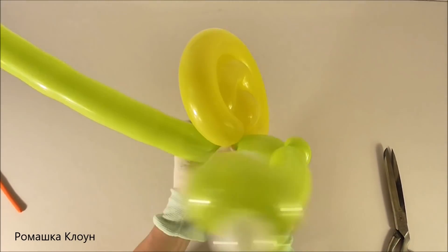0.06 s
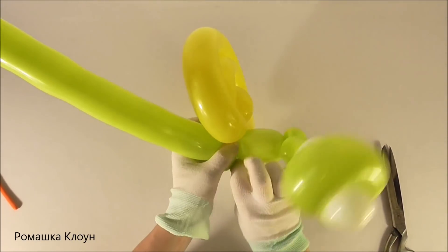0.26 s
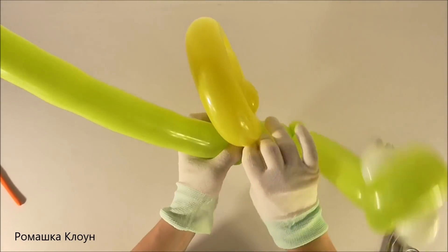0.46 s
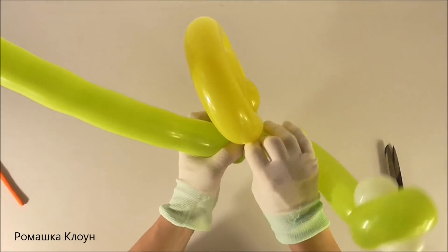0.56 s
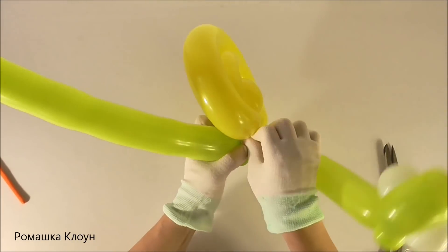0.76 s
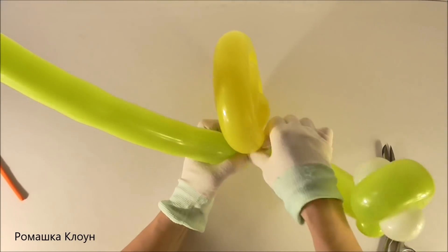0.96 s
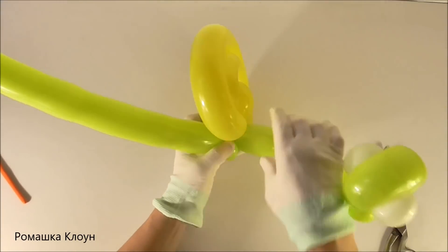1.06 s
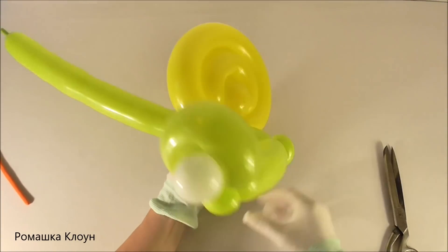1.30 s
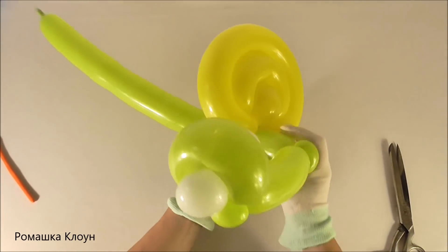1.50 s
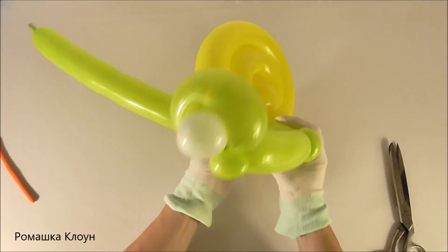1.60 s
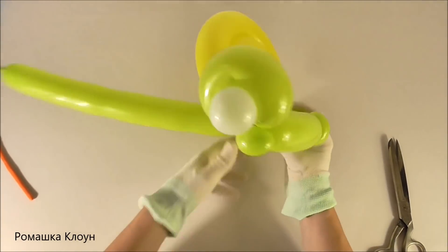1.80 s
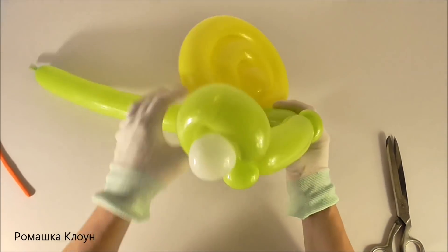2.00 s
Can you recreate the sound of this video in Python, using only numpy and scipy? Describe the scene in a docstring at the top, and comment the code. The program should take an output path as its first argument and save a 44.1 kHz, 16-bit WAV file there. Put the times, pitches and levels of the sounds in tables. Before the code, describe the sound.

Inflated balloons rub together with sharp snaps, brief squeaks and a soft glove hiss.

```python
"""Long latex balloons snap and squeak as gloved hands twist and press them together, close by.
The skins stick and let go: each slip is a sharp snap and a few falling cycles of squeak, and it
rings the air inside. Fast runs of tiny catches make creaks. Between slips the gloves tick and slide
with a grainy hiss, and the balloons bump softly. A table and the walls of a small room add short echoes."""
import sys
import numpy as np
from scipy import signal
from scipy.fft import rfft, irfft, next_fast_len
from scipy.io import wavfile
from scipy.ndimage import uniform_filter1d

SR = 44100
rng = np.random.default_rng(int(sys.argv[2]) if len(sys.argv) > 2 else 0)


def digitize_waveform(pressure):
    """Quantize a signal to 16-bit integers and store it at the path in sys.argv[1].

    Rows of a 2-D input are taken as channels; values are limited to [-1, 1].
    """
    field = np.atleast_2d(pressure).T
    bounded = np.clip(field, -1, 1)
    quanta = np.round(bounded * 32767).astype(np.int16)
    wavfile.write(sys.argv[1], SR, quanta)


N = 90404
SNAP_RISE_S = 0.00029


def undb(db):
    """Turn decibels (dB) into a number to multiply by."""
    return 10 ** (np.asarray(db) / 20)


def unit(x):
    """Scale a sound to an average power of 1."""
    return x / np.sqrt(np.mean(x ** 2))


def over_hz(points, hz):
    """Read between (Hz, value) points, giving each octave equal room."""
    p = np.array(points, float)
    return np.interp(np.log(np.maximum(hz, 1)), np.log(p[:, 0]), p[:, 1])


def colour(x, points, tilt_db=0):
    """Shape the tone through (Hz, dB) points; above 1500 Hz, tilt it by tilt_db per octave."""
    size = next_fast_len(2 * x.shape[-1])
    hz = np.fft.rfftfreq(size, 1 / SR)
    db = over_hz(points, hz) + tilt_db * np.log2(np.maximum(hz, 1500) / 5500)
    # Fold the filter so that it never rings before the sound arrives.
    cepstrum = irfft(np.log(undb(db)), size)
    cepstrum[1:size // 2] *= 2
    cepstrum[size // 2 + 1:] = 0
    return irfft(rfft(x, size) * np.exp(rfft(cepstrum)), size)[..., :x.shape[-1]]


def add(out, at_s, x):
    """Mix x into out, starting at at_s seconds."""
    i = max(int(at_s * SR), 0)
    out[i:i + len(x)] += x[:max(N - i, 0)]


def walk(rate):
    """A smooth random wander that picks a new value rate times a second."""
    hold = int(SR / rate)
    steps = np.repeat(rng.standard_normal(N // hold + 1), hold)
    return 1.3 * uniform_filter1d(uniform_filter1d(steps, hold), hold)[:N]


def stereo(mid, side):
    """Make left and right: mid is what they share, side adds width."""
    return np.array([mid + side, mid - side])


def burst(rise_s, decay_s, size=2048):
    """A puff of noise that dies at once, its energy spread evenly from low to high."""
    t = np.arange(size) / SR
    fade = (1 - np.exp(-t / rise_s)) * np.exp(-t / decay_s)
    x = fade * rng.standard_normal(size)
    for _ in range(4):  # even out the tone, then restore the fade
        flat = irfft(np.exp(1j * np.angle(rfft(x))))
        x = fade * flat / np.sqrt(uniform_filter1d(flat ** 2, size=45) + 1e-12)
    return x / np.sqrt(np.sum(x ** 2))


def quiet_background():
    """A faint, steady rumble and hiss."""
    # Each row: frequency in Hz, relative level in dB.
    tone = [(20, -4.5), (100, 14), (300, 4.5), (1000, -17), (4000, 0), (16000, -46)]
    mid, side = unit(colour(rng.standard_normal((2, N)), tone)) * undb(-69.5)
    return stereo(mid, .5 * side)


def room_echo(x, delay_s=0.0021):
    """The table and near walls return a short blur of echoes, duller as it fades."""
    # How long the room rings. Each row: frequency in Hz, seconds to fade by 60 dB.
    fade_times = [(100, 0.29), (500, 0.21), (1500, 0.24), (5000, 0.16), (9000, 0.1), (16000, 0.049)]
    # The tone of the echoes. Each row: frequency in Hz, level in dB.
    tone = [(100, -19), (300, -4), (900, -11), (2200, -8.5), (5000, -9.5), (9000, -12.5), (16000, -18.5)]
    size = N // 4
    t, hz = np.arange(size) / SR, np.fft.rfftfreq(size, 1 / SR)
    noise = rfft(rng.standard_normal((2, size))) * undb(over_hz(tone, hz))
    onset = np.clip(t / delay_s - .5, 0, 1)
    centres = np.geomspace(100, 16000, 9)
    tail = 0
    for centre, pick in zip(centres, np.eye(len(centres))):
        fade = onset * np.exp(-np.log(1000) * t / over_hz(fade_times, centre))
        band = irfft(noise * over_hz(np.c_[centres, pick], hz), size)
        tail = tail + band * fade / np.sqrt(np.sum(fade ** 2))
    return signal.fftconvolve(x[None], stereo(tail[0], 0.39 * tail[1]), axes=1)[:, :N]


def table_echo(x):
    """The first echoes off the table reach left and right differently, which adds width."""
    # The tone of these echoes. Each row: frequency in Hz, level in dB.
    tone = [(60, -11), (250, -9), (700, -16.5), (1400, -21), (2800, -14), (5500, -19.5), (9500, -6),
            (15000, -10.5)]
    echoes = colour(burst(SNAP_RISE_S, decay_s=.001), tone)
    return stereo(0, signal.fftconvolve(x, echoes)[:N])


def balloon_air(x):
    """The air inside the balloons rings on with a hollow note."""
    # The air's notes. Each row: pitch in Hz, relative level in dB, seconds to fade by 60 dB.
    notes = [(244.6, -12, 0.18), (358, -11.5, 0.35), (587, -5.5, 0.34), (682.6, -6, 0.15),
             (743.3, -6, 0.11), (833, -3.5, 0.2), (923.6, 4, 0.16), (1057, -8.5, .22), (1268, 3.5, 0.094),
             (1529, -4.5, 0.44), (1816, -4.5, 0.16), (2230, -4, 0.21), (2353, -1.5, 0.19)]
    t = np.arange(N // 4) / SR
    ring = sum(undb(db) * np.cos(2 * np.pi * hz * t) * np.exp(-np.log(1000) * t / fade_s)
               for hz, db, fade_s in notes)
    return undb(-52) * signal.fftconvolve(x, ring)[:N]


def grains(per_s, spread_db=1.5):
    """Countless tiny catches of uneven size."""
    hit = rng.random(N) < per_s / SR
    size = undb(spread_db * np.minimum(rng.exponential(size=N), 6))
    return unit(hit * size * rng.choice([-1, 1], N))


def sliding_gloves(flicker_db=1.5):
    """Gloves slide over the latex: fine grains hiss, coarser ones rustle the skin."""
    # Each row: time in seconds, then relative levels in dB of the hiss, its top treble and the rustle.
    levels = [(0, -48.5, -76, -50), (0.098, -50.5, -55.5, -55.5), (.15, -49, -49, -52),
              (.265, -48.5, -47, -55), (.285, -60, -67, -61), (.318, -57, -68, -58.5),
              (0.344, -53, -53, -58.5), (.44, -50, -61, -48), (.52, -54, -58, -50.5), (.64, -56, -80, -63),
              (0.691, -50, -60, -43), (.78, -59.5, -67, -76), (.85, -61.5, -59, -63.5),
              (.93, -54, -58, -58), (1.0, -57.5, -67, -54.5), (1.08, -59, -64, -49.5),
              (1.16, -60, -61, -59.5), (1.23, -55.5, -57, -56.5), (1.34, -66, -82, -60.5),
              (1.42, -68.5, -89, -55), (1.505, -71, -81, -61.5), (1.549, -51, -67, -46.5),
              (1.62, -47, -54, -54.5), (1.68, -50.5, -61, -57), (1.79, -53, -61, -55.5),
              (1.845, -49, -47, -59), (1.885, -58.5, -70, -54), (1.962, -75.5, -73.5, -71),
              (2.05, -63, -71.5, -56)]
    # The tones of those three layers. Each row: frequency in Hz, relative level in dB.
    hiss_tone = [(500, -13.5), (1600, 0), (2700, -6.5), (4000, 1), (5600, 5), (8000, 1), (10500, -14.5),
                 (16000, -28.5)]
    top_tone = [(3000, -31.5), (6500, -11), (8700, 1.5), (11000, -5), (14000, -8.5), (16500, -19)]
    rustle_tone = [(25, -9), (60, -8), (130, -5.5), (250, 2), (400, -1), (600, 1.5), (900, 0.5),
                   (1500, -2.5), (2600, -11.5), (6000, -14.5)]
    t = np.arange(N) / SR
    times, hiss_db, top_db, rustle_db = np.array(levels).T

    def layer(tone, level_db, grains_per_s):
        mid, side = (unit(colour(grains(grains_per_s), tone)) for _ in range(2))
        db = np.interp(t, times, level_db) + flicker_db * walk(70.62)
        return stereo(mid, 0.28 * side) * undb(db)

    hiss = layer(hiss_tone, hiss_db - 5, grains_per_s=2900)
    top = layer(top_tone, top_db - 5, grains_per_s=2900)
    rustle = layer(rustle_tone, rustle_db - 1, grains_per_s=980)
    return hiss + top + rustle


def creaking(jitter=0.083, spread_db=3.5):
    """Latex catches and slips in a fast, uneven run that swells and fades."""
    # Each row: loudest moment in seconds, swell time in seconds, catches per second, level in dB.
    creaks = [(1.111, 0.0079, 800, -35), (1.225, 0.038, 1030, -57.5)]
    # The tone of a creak. Each row: frequency in Hz, relative level in dB.
    tone = [(400, -22), (800, 6.5), (1100, 6.5), (1300, -14), (1750, 3), (2600, -22), (3800, -1.5),
            (4800, -11.5), (7000, -11.5), (16000, -37)]
    t, out = np.arange(N) / SR, np.zeros(N)
    for peak_s, swell_s, per_s, db in creaks:
        gap, size = rng.standard_normal((2, 3000))
        times = np.cumsum(np.exp(jitter * gap)) / per_s
        pulses = np.bincount((times * SR).astype(int), undb(spread_db * size), N)[:N]
        swell = 1 / np.cosh(np.clip((t - peak_s) / swell_s, -20, 20))
        out += undb(db) * swell * unit(colour(pulses - pulses.mean(), tone))
    return out


def wobble(hz, db, swell_s, pitch_fall, overtone_db=-19):
    """A few swings of the skin that swell, fade and fall in pitch as the tension lets go."""
    age = np.arange(4096) / SR / swell_s  # 1 at the loudest moment
    pitch = hz * np.exp(-pitch_fall * (np.minimum(age, 2) - 1))
    phase = 2 * np.pi * np.cumsum(pitch) / SR
    swell = (age * np.exp(1 - age)) ** 2
    return undb(db) * swell * (np.sin(phase) + undb(overtone_db) * np.sin(2 * phase))


def snap(snap_db, tilt_db, decay_s, rattle_db):
    """The grip breaks: a bright crack, hollowed by its echo across the balloon, and a skin rattle."""
    # The tones of the crack and the rattle. Each row: frequency in Hz, relative level in dB.
    crack_tone = [(300, -36.5), (1200, -19.5), (2100, -3), (2800, -11.5), (3900, -4), (5600, -2.5),
                  (8000, -3.5), (10000, -10), (14000, -15), (17000, -32.5)]
    rattle_tone = [(60, -22), (200, -9.5), (450, -2.5), (900, -1), (1500, -4), (2300, -10), (3500, -17.5),
                   (8000, -67)]
    crack = colour(burst(SNAP_RISE_S, decay_s), crack_tone, tilt_db)
    t = np.arange(len(crack)) / SR
    round_trip_s = 0.000682 * np.exp(.12 * rng.standard_normal())
    echo = np.interp(t - round_trip_s, t, crack, left=0)
    rattle = colour(burst(rise_s=0.00074, decay_s=0.00305), rattle_tone)
    return undb(snap_db) * (crack + 0.61 * echo) + undb(rattle_db) * rattle


def soft_bumps():
    """A whole balloon is bumped and gives a brief, low wobble."""
    # Each row: start in seconds, pitch in Hz, level in dB, swell time in seconds.
    bumps = [(.008, 550, -42.5, 0.0035), (0.179, 249, -45.5, 0.0094), (.323, 400, -45.5, 0.0025),
             (.327, 188, -42, 0.0036), (0.444, 250, -48.5, .007), (0.5426, 162, -24.5, 0.0019),
             (.703, 170, -39, 0.0022), (1.045, 483, -30.5, 0.00244), (1.523, 482, -37.5, 0.0039),
             (1.868, 247, -43, 0.0048)]
    out = np.zeros(N)
    for at_s, hz, db, swell_s in bumps:
        add(out, at_s, wobble(hz, db, swell_s, pitch_fall=0.085))
    return out


def glove_ticks():
    """A glove catches on the skin and lets go with a small snap."""
    # Each row: start in seconds, snap level in dB, rattle level in dB.
    ticks = [(0.1757, -13.5, -13), (.396, -26, -32), (.618, -24, -12), (.636, -17, -25), (.662, -15.5, -25),
             (0.7009, -3.5, -14.5), (.717, -14, -10), (1.042, -17, -3), (1.1997, -23, -11),
             (1.25, -29, -22), (1.284, -22, -30), (1.3028, -19, -25), (1.4282, -20.5, -9),
             (1.514, -29.5, -26.5), (1.565, -24.5, -32), (1.611, -11, -16), (1.656, -14.5, -22),
             (1.808, -10.5, -18.5), (1.991, -27.5, -33.5)]
    out = np.zeros(N)
    for at_s, snap_db, rattle_db in ticks:
        add(out, at_s, snap(snap_db, tilt_db=0, decay_s=0.0034, rattle_db=rattle_db))
    return out


def latex_slips():
    """Latex sticks to latex, then slips with a snap and a short, falling squeak."""
    # Each row: start in seconds, snap level in dB, snap tilt in dB per octave, snap decay in seconds,
    # rattle level in dB, squeak pitch in Hz, squeak level in dB, squeak swell time in seconds.
    slips = [ (0.2034, -7.5, -1.5, 0.0038, -0.5, 1510, -33, 0.0023),
             (.2153, -2.5, -4, 0.002, -3.5, 930, -37, 0.0028),
             (0.3672, -16, 3.5, 0.0035, 1.5, 741, -25.5, 0.0031),
             (0.42, -2, 0.5, .002, -10.5, 1750, -40, 0.001),
             (0.5424, 10, -4.5, 0.0019, 10.5, 1209, -20.5, 0.0014),
             (0.6683, 7.5, 0, 0.0013, 0, 1816, -28, 0.00068),
             (0.7047, 5.5, -4, 0.0017, 10, 867, -13.5, 0.0013),
             (.8840, -12, 8, 0.0048, -2.5, 710, -41, 0.0027),
             (1.0450, -2.5, -1, 0.0037, 7.5, 1360, -23.5, 0.0016),
             (1.1005, -13, -3, 0.0058, 1, 846, -28, 0.0037),
             (1.1075, -21, -8, .006, -4, 801, -23.5, 0.0028),
             (1.5340, -10.5, -1.5, .003, -4, 869, -28.5, 0.0025),
             (1.7110, 1.5, 2, 0.0018, 2, 1210, -29, 0.0017)]
    out = np.zeros(N)
    for at_s, snap_db, tilt_db, decay_s, rattle_db, hz, squeak_db, swell_s in slips:
        add(out, at_s, snap(snap_db, tilt_db, decay_s, rattle_db))
        add(out, at_s, wobble(hz, squeak_db, swell_s, pitch_fall=0.092))
    return out


def scene():
    """The balloon skins ring the air inside them, over a table in a quiet room."""
    skin = latex_slips() + glove_ticks() + soft_bumps() + creaking() + sliding_gloves()
    balloons = skin + balloon_air(skin.mean(axis=0))
    mono = balloons.mean(axis=0)
    return quiet_background() + balloons + table_echo(mono) + room_echo(mono)


def record(dry):
    """Cut the treble above 16000 Hz."""
    return signal.sosfilt(signal.ellip(8, .2, 80, 16000, fs=SR, output="sos"), dry)


dry = scene()
out = record(dry)
digitize_waveform(out)
```